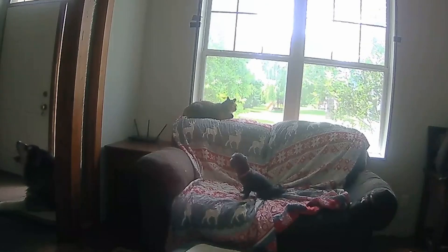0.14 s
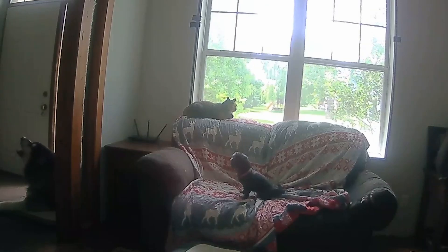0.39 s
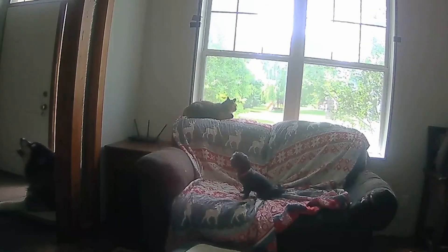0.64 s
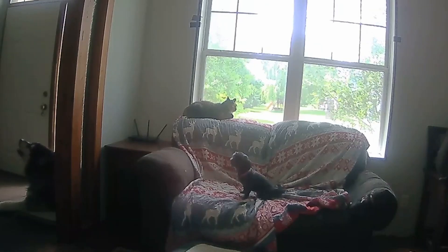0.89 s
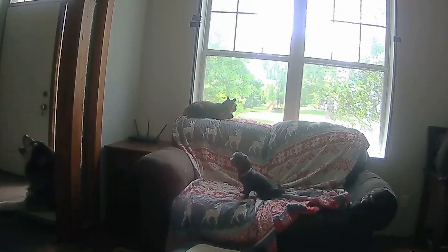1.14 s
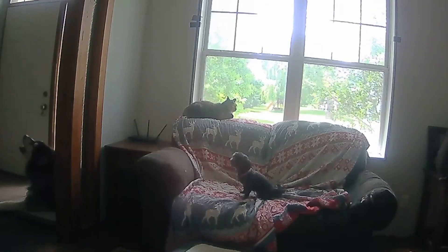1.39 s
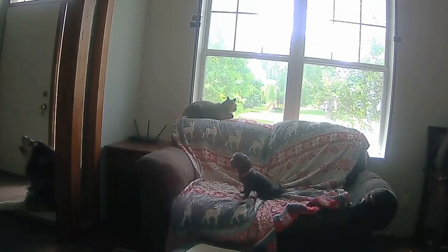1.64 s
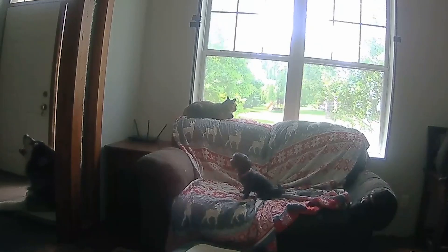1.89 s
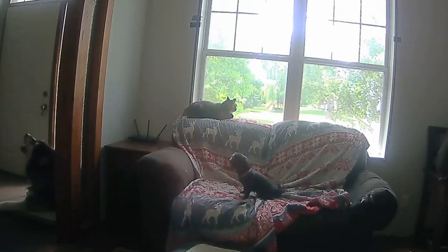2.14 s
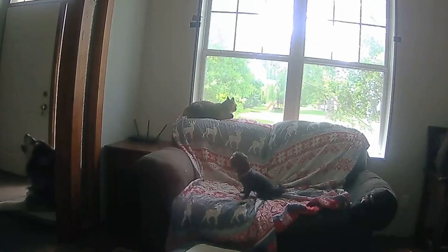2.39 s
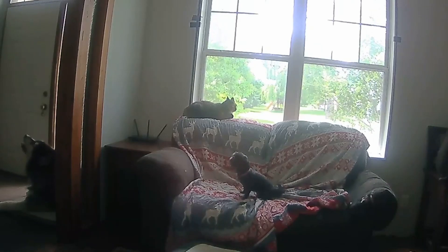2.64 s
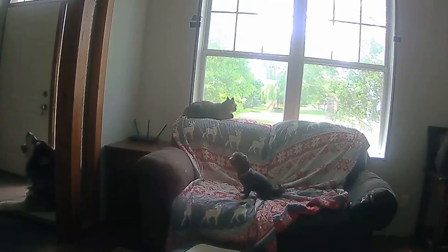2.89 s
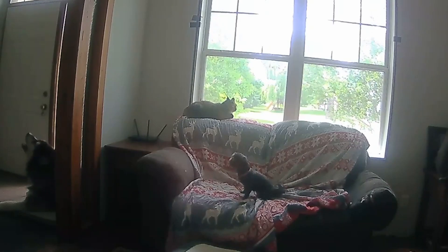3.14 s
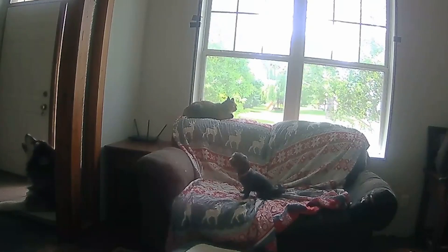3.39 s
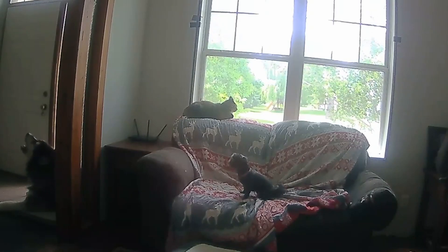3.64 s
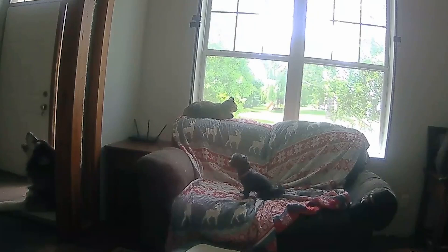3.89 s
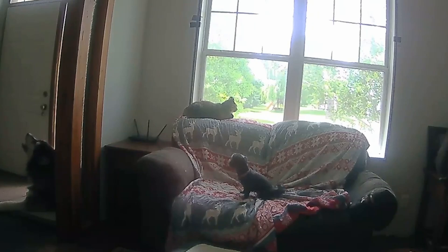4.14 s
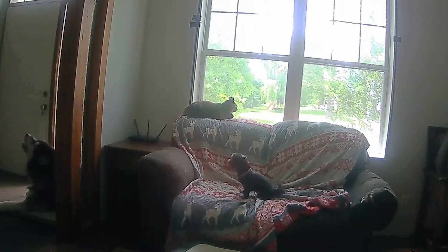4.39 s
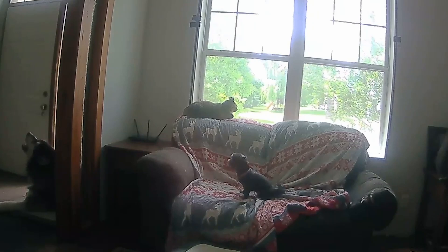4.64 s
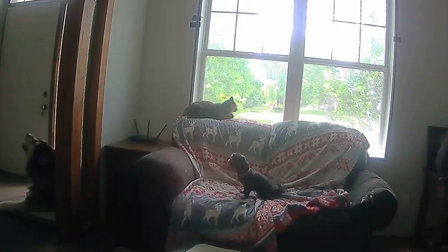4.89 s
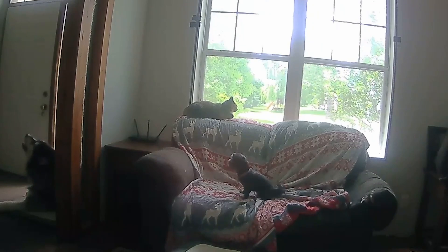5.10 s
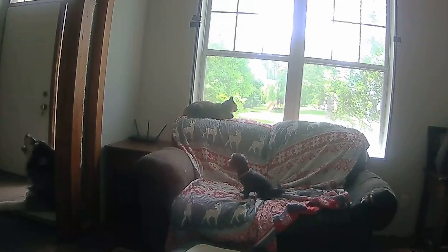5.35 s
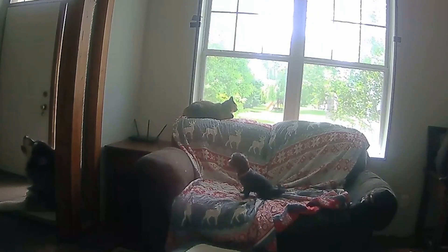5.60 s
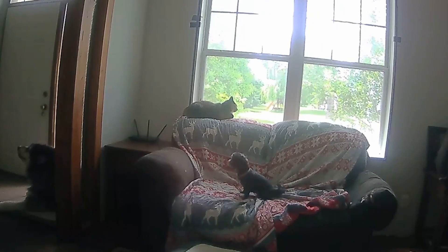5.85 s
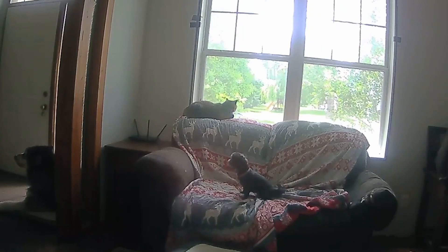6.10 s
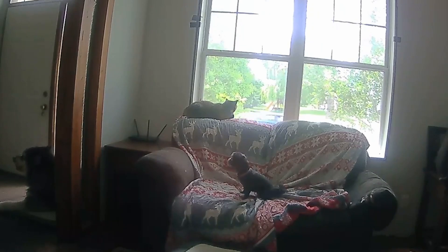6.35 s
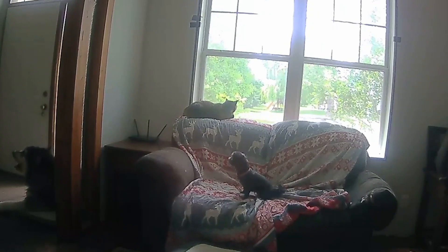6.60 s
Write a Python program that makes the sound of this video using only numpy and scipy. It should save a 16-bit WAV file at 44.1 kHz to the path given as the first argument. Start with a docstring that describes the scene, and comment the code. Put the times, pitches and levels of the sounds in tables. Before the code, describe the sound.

Two dogs howl in a reverberant living room, picked up at a distance by a cheap camera microphone. From 0.1 s the small dog gives a long, high yelp that leaps up, cracks at 0.4 s and slides lower until 1.1 s; the large dog's smooth, lower howl sounds beneath it at 0.2-0.6 s. The large dog calls loudly again at 1.1, 2.0, 2.9, 3.8, 4.6 and 5.5 s, each howl about half a second or less, rising slightly then sagging, the last ones softer. The small dog answers at 1.45, 2.2, 3.1, 3.6, 4.2 and 4.8 s with raspy, whistling, breaking yelps. After a quiet pause near 6 s, it yelps sharply at 6.2 s and falls away hoarsely to 6.7 s. Loud calls clip harshly, quiet tails are suppressed, fuzz and faint hiss remain, and tiny dropouts cut in around 0.8, 1.8, 2.7, 2.9 and 4.0 s.

```python
"""A large dog howls in short low calls while a small dog answers with high gliding yelps, in an echoing living room.
Each call is a stack of gliding harmonics; roughness shakes it, and the small dog adds raspy breath and a second pipe.
Feedback delays and ringing resonances make the room, over a faint steady noise.
A cheap room camera overloads on the loud moments, turns quiet sound down, adds fuzz and loses a few packets."""
import sys
import numpy as np
from scipy import signal
from scipy.fft import rfft, irfft, next_fast_len
from scipy.io import wavfile
from scipy.ndimage import uniform_filter1d

SR = 44100
rng = np.random.default_rng(int(sys.argv[2]) if len(sys.argv) > 2 else 0)


def generate_wav(sig):
    """Save sig (samples, or channels by samples) to the path in sys.argv[1] as 16-bit PCM at SR."""
    pcm = np.round(np.clip(np.atleast_2d(sig).T, -1, 1) * 32767).astype(np.int16)
    wavfile.write(sys.argv[1], SR, pcm)


def attenuation_scalar(level_db):
    """Turn a level in dB into a linear amplitude multiplier (20 dB per decade)."""
    decades = np.asarray(level_db, float) / 20
    return 10 ** decades


N = 297305


def wobble(rate_hz):
    """Low-passed noise of spread 1, for irregular movement."""
    lowpass = signal.butter(2, rate_hz, fs=SR, output="sos")
    slow = signal.sosfilt(lowpass, rng.standard_normal(N))
    return slow / slow.std()


def resonate(x, hz, width_hz):
    """One two-pole resonance with gain 1 on top."""
    r = np.exp(-np.pi * width_hz / SR)
    feedforward = [(1 - r * r) / 2, 0, (r * r - 1) / 2]
    feedback = [1, -2 * r * np.cos(2 * np.pi * hz / SR), r * r]
    return signal.lfilter(feedforward, feedback, x + 1e-18)


def share_effort(rows, muzzle):
    """The muzzle and the mouth opening share the effort among three harmonics, keeping their total power."""
    time_s, pitch_hz, effort_db, opening_db = np.transpose(rows)
    muzzle_hz, muzzle_db = np.transpose(muzzle)
    colour_db = np.array([k * opening_db + np.interp((k + 1) * pitch_hz, muzzle_hz, muzzle_db)
                          for k in range(3)])
    colour_db = colour_db - 10 * np.log10(np.sum(attenuation_scalar(colour_db) ** 2, axis=0))
    return np.transpose([time_s, pitch_hz, *(effort_db + colour_db)])


# breath is bright from STRAIN_DB of effort up; softer breath is dull above SOFT_BREATH_HZ
STRAIN_DB, SOFT_BREATH_HZ, SOFT_BREATH_DB = -17.5, 1890, 3.5


def voice(calls, mouth, count, hoarseness, jitter, tremor_hz, breath, fade_s):
    """Each call stacks harmonics; a hoarse larynx shakes pitch and loudness and lets the given breath through."""
    out = np.zeros(N)
    slow, fast, tremor = wobble(30), wobble(150), wobble(tremor_hz)
    soften = signal.butter(4, SOFT_BREATH_HZ, fs=SR, output="sos")
    dull_breath = signal.sosfilt(soften, breath)
    mouth_hz, mouth_db = np.transpose(mouth)
    for call in calls:
        time_s, pitch_hz, *harmonics_db = np.transpose(call)
        at = np.arange(round(time_s[0] * SR), min(round(time_s[-1] * SR), N))
        t = at / SR
        hoarse = np.interp(t, *np.transpose(hoarseness))
        shake = jitter * (slow[at] + 8.9 * hoarse ** 2 * fast[at])
        pitch = np.interp(t, time_s, pitch_hz)
        phase = 2 * np.pi * np.cumsum(pitch * (1 + shake)) / SR

        gains = [np.sqrt(2) * attenuation_scalar(np.interp(t, time_s, db)) for db in harmonics_db]
        effort = np.sqrt(sum(g ** 2 for g in gains))
        # the mouth sets each higher harmonic against the last one listed
        last = gains[-1]
        for number in range(len(gains) + 1, count + 1):
            gains.append(last * attenuation_scalar(np.interp(number * pitch, mouth_hz, mouth_db)))
        # every harmonic flutters quickly by a few dB, as echoes in the room make it uneven
        gains = [g * attenuation_scalar(2.0 * np.roll(slow, 9001 * k)[at]) for k, g in enumerate(gains)]
        stack = sum(g * np.sin((k + 1) * phase + k * k) for k, g in enumerate(gains))
        stack = stack * (np.sqrt(1 - hoarse ** 2) + hoarse * tremor[at])

        # breath escapes once a cycle, while the folds are open
        strain = np.minimum(effort / attenuation_scalar(STRAIN_DB), 1)
        air = strain * breath[at] + (1 - strain) * attenuation_scalar(SOFT_BREATH_DB) * dull_breath[at]
        puffs = effort * hoarse ** 2 * (1 + np.cos(phase)) * air
        fade = np.clip(np.minimum(t - time_s[0], time_s[-1] - t) / fade_s, 0, 1)
        out[at] += (stack + puffs) * fade
    return out


# large dog, one list a howl, the opening in dB per harmonic: time_s, pitch_hz, effort_db, opening_db
LARGE_DOG_HOWLS = [
    [(0.0, 479, -52.5, -8), (0.05, 463, -45.5, -1), (0.1, 450, -43.5, -1.5)],
    [(0.235, 471, -25.5, -17), (0.26, 481, -19, -12.5), (0.4, 495.2, -14, -2), (0.47, 497.3, -10, -7.5),
     (0.54, 469, -19.5, 0.4), (0.585, 462.3, -20.5, -12.5), (0.63, 475, -28, -9.5)],
    [(1.08, 446, -30.5, -13), (1.1, 446, -11.5, -7), (1.23, 462, -4, -8.5), (1.33, 454.7, -5, -9),
     (1.37, 449.6, -14.5, -9), (1.43, 441.6, -20, -4.5), (1.48, 436, -18.5, 0.5), (1.52, 432, -34.5, -10.5)],
    [(1.93, 402, -65, -14), (1.96, 437, -39, -19), (2.02, 458, -64.5, -17.5)],
    [(2.03, 429, -57, -5), (2.047, 426.7, -20, -9), (2.1, 443.4, -14, -3.5), (2.16, 463.3, -4.5, -4),
     (2.225, 457, -11, -7.5), (2.28, 454, -41, -5.5)],
    [(2.9, 433, -55, -3), (2.92, 442, -18.5, -12.5), (2.955, 436.7, -16, -2), (3.02, 454.4, -7.5, -4),
     (3.1, 455.9, -4, -5), (3.145, 440, -34.5, -2.3), (3.26, 427.3, -20.5, -3.5), (3.295, 430.8, -36.5, 2),
     (3.34, 432, -25, -5)],
    [(3.77, 456, -38, -8.5), (3.785, 444, -22.5, -11.5), (3.83, 445, -16.5, -6), (3.947, 456.1, -6, -5.5),
     (4.03, 445.5, -15.5, -4), (4.1, 443.6, -18, -6), (4.145, 431.5, -18, -3.5), (4.2, 420, -34.5, -4.5),
     (4.26, 391, -33, -15)],
    [(4.56, 440, -37.5, -7), (4.585, 443, -24, -9), (4.625, 446.3, -16.5, -3.5), (4.665, 449.8, -23, -2),
     (4.7, 451, -10.5, -7), (4.77, 454.7, -12, -6), (4.8, 440.2, -21.5, -2.8), (4.893, 432, -27.5, 1),
     (4.99, 398.2, -31, -5.5), (5.06, 383, -41, -3)],
    [(5.48, 420, -66, -12), (5.497, 433, -21.5, -14.5), (5.535, 444.2, -17, -4), (5.57, 450, -22, -6),
     (5.61, 458, -13.5, -2.5), (5.65, 452, -24, 1.2), (5.7, 442.4, -26.5, 0.5), (5.76, 429.5, -38, -1.5),
     (5.86, 409, -55, 3)],
]
# its muzzle, for the first three harmonics: frequency_hz, level_db
LARGE_DOG_MUZZLE = [(450, -1.08), (900, 3), (1350, -1.8)]
# its mouth, for higher harmonics, against the 3rd: frequency_hz, level_db
LARGE_DOG_MOUTH = [(1700, -21), (2300, -35.5), (3000, -40)]
# hoarseness 0-1: howls that stay under FAINT_DB of effort are rough, the others clear
CLEAR, ROUGH, FAINT_DB = .09, .7, -35


def large_dog():
    """Low howls of six harmonics: nearly pure from a steady larynx, rough when faint, with no breath noise."""
    hoarseness = []
    for rows in LARGE_DOG_HOWLS:
        loudest_db = max(row[2] for row in rows)
        hoarse = ROUGH if loudest_db < FAINT_DB else CLEAR
        hoarseness += [(rows[0][0], hoarse), (rows[-1][0], hoarse)]
    calls = [share_effort(rows, LARGE_DOG_MUZZLE) for rows in LARGE_DOG_HOWLS]
    return voice(calls, LARGE_DOG_MOUTH, count=6, hoarseness=hoarseness, jitter=.003,
                 tremor_hz=120, breath=np.zeros(N), fade_s=.015)


# relative colour of the quiet room tone: frequency_hz, density_db (per Hz)
ROOM_TONE_COLOUR = [(35, -30), (60, -9), (729, -8), (1350, -10.5), (8000, -9.5), (10400, -58),
                    (17600, -120)]
ROOM_TONE_DB = -61.5


def room_tone():
    """Faint steady noise, coloured along a log-frequency curve."""
    hz = np.maximum(np.arange(N // 2 + 1) * SR / N, 1)
    curve_hz, curve_db = np.transpose(ROOM_TONE_COLOUR)
    colour = attenuation_scalar(np.interp(np.log(hz), np.log(curve_hz), curve_db))
    noise = irfft(rfft(rng.standard_normal(N)) * colour, N)
    return attenuation_scalar(ROOM_TONE_DB) * noise / noise.std()


# strongest ringing pitches of the room: frequency_hz, level_db, t60_s
RINGING_MODES = [(440, -12.5, 0.087), (588, -23.5, 0.91), (773, -5, 0.68), (863, -1, .5),
                 (1045.7, 3.5, 0.17), (1250, -5.5, 0.49), (1192, 1, 0.3), (1350, -14.5, 0.51)]
ROOM_T60_S, WALL_CUT_HZ, ROOM_DB = 0.27, 13000, -10


def room(x):
    """Ten feedback delays, duller on every round, plus a few narrow resonances that hold a passing pitch."""
    size = next_fast_len(N + SR)
    hz = np.arange(size // 2 + 1) * SR / size
    dull = 1 / np.sqrt(1 + (hz / WALL_CUT_HZ) ** 2)
    tail = 0
    for k, lag_s in enumerate(rng.uniform(.018, 0.049, size=10)):
        loop = attenuation_scalar(-60 * lag_s / ROOM_T60_S) * dull ** .5 * np.exp(-2j * np.pi * hz * lag_s)
        tail = tail + (-1) ** k * loop / (1 - loop)
    out = attenuation_scalar(ROOM_DB) * irfft(rfft(x, size) * tail, size)[:N]
    for mode_hz, level_db, t60_s in RINGING_MODES:
        width_hz = np.log(1000) / (np.pi * t60_s)
        out += attenuation_scalar(level_db) * resonate(x, mode_hz, width_hz)
    return out


# throat resonances that colour the small dog's rasp, levels relative: frequency_hz, width_hz, level_db
THROAT_RESONANCES = [(1050, 190, 11.5), (1940, 260, -12.5), (2640, 670, 1), (3890, 230, -3.5),
                     (5700, 1900, 2.5)]


def rasp(level_db):
    """Turbulent breath: white noise coloured by the throat, each resonance passed twice."""
    white = rng.standard_normal(N)
    out = np.zeros(N)
    for k, (hz, width_hz, peak_db) in enumerate(THROAT_RESONANCES):
        ringing = resonate(resonate(white, hz, width_hz), hz, 2 * width_hz)
        out += (-1) ** k * attenuation_scalar(peak_db) * ringing
    return attenuation_scalar(level_db) * out / out.std()


# small dog, one list for each stretch of voice; a yelp whose pitch breaks takes two lists;
# the opening in dB per harmonic: time_s, pitch_hz, effort_db, opening_db
SMALL_DOG_YELPS = [
    [(0.092, 765.6, -43, 5.5), (0.106, 813.6, -18.5, 4), (0.128, 1025, -10, -1), (0.142, 1175, -10, -6.5),
     (0.158, 1179, -8.5, -1.5), (0.202, 1179, -22, -1), (0.286, 1246, -13.5, -1.5),
     (0.4, 1169, -17.5, -9.5)],
    [(0.4, 1006, -12.5, -11), (0.448, 995, -21, -1), (0.54, 838, -24, -5), (0.622, 885.4, -20.5, 3),
     (0.774, 761, -29.5, -3.5), (0.79, 701.7, -27, -8), (0.872, 704.6, -26.5, -10.5),
     (0.915, 754, -21, -5.5), (0.962, 778, -12, -9), (1.066, 758, -17, -11), (1.14, 772, -15.5, -13.5)],
    [(1.45, 710, -26.5, -15.5), (1.476, 849.3, -25.5, -6.5), (1.492, 928.6, -13, -6.5),
     (1.518, 1039, -9, -10), (1.548, 978, -17.5, 4), (1.8, 980.7, -56, 4)],
    [(2.21, 834.5, -13.5, 2), (2.23, 846, -15, 5.5), (2.4, 946.6, -29.5, 5.5), (2.418, 1050, -26.5, 7),
     (2.502, 1149, -10.5, -5), (2.515, 1035, -29, 1), (2.57, 1085, -26, 0), (2.62, 1048, -25, 1.9),
     (2.708, 894.3, -21.5, -4), (2.806, 854.6, -25, -4), (2.826, 739, -39.5, -6), (2.91, 706, -31.5, -14)],
    [(3.09, 816.7, -29.5, 2.5), (3.13, 1021, -10.5, -3), (3.174, 924, -17, 1), (3.21, 962, -19, 0.8),
     (3.25, 942, -24.5, -3), (3.34, 950, -36, 3)],
    [(3.6, 816, -56, 10.5), (3.626, 828, -16, 0.5), (3.664, 927, -18, 0.6), (3.69, 816, -13, 10),
     (3.756, 883, -39.5, 4), (3.84, 914, -31, -5.5)],
    [(4.24, 782, -35.5, -8.5), (4.26, 824.6, -18.5, 2.5), (4.302, 952.5, -18, 8.5), (4.35, 862, -18.5, 8),
     (4.37, 904, -31, 13), (4.492, 885.6, -32.5, -2.5), (4.58, 782, -40.5, -26)],
    [(4.79, 760, -31, -4.5), (4.81, 891.5, -14.5, -3), (4.852, 910.6, -22.5, 8), (4.89, 860.3, -17, 4.5),
     (4.916, 863, -26.5, 6.5), (5.034, 834.5, -44.5, -14.5), (5.138, 892, -64.5, -23),
     (5.45, 737, -64, -24)],
    [(6.238, 762, -39.5, 6), (6.258, 915.6, -13.5, -3), (6.29, 1146, -10.5, -7), (6.315, 1208, -10.5, -5),
     (6.345, 1168, -12, -9), (6.37, 1012, -7, -4)],
    [(6.37, 1008, -11, 7.3), (6.41, 989.6, -25, -5.5), (6.44, 887, -31, 2), (6.494, 792, -31, -3),
     (6.545, 709.7, -30.5, -9.8), (6.61, 714, -29, -10.8), (6.692, 634, -27, -22),
     (6.74, 539.5, -34.5, -26)],
]
# how torn its voice is: time_s, hoarseness (0-1)
SMALL_DOG_HOARSENESS = [(.09, .3), (.13, .5), (.5, .5), (.56, .25), (1.14, .15), (1.55, .3), (1.62, .55),
                        (2.21, .65), (2.4, .6), (2.46, .3), (2.6, .2), (2.91, .3), (3.09, .4), (3.2, .5),
                        (3.3, .25), (3.46, .1), (3.6, .45), (3.7, .6), (4.24, .45), (4.79, .3), (5, .45),
                        (5.1, .95), (5.45, .95), (6.24, .4), (6.29, .5), (6.34, .45), (6.38, .65),
                        (6.46, .5), (6.7, .65)]
# its muzzle, for the first three harmonics: frequency_hz, level_db
SMALL_DOG_MUZZLE = [(700, -3), (1100, 3), (1700, 5), (2100, 1), (2600, -0.85), (3500, 1.7)]
# its mouth, for higher harmonics, against the 3rd: frequency_hz, level_db
SMALL_DOG_MOUTH = [(2500, -13.5), (3600, -1.5), (4200, -8.5), (5000, -9.5), (5700, -4.5), (7000, -16.5)]
# a second, unrelated pipe in its hardest cries, one list a whistle: time_s, pitch_hz, level_db
SECOND_PIPE = [
    [(1.55, 1041, -22), (1.66, 994.3, -22.5), (1.818, 1033, -39.5), (1.86, 1156, -39), (1.89, 1116, -63.5)],
    [(2.25, 1164, -40.5), (2.276, 1125, -12), (2.384, 1147, -17), (2.396, 1050, -17), (2.44, 984, -19.5)],
    [(3.17, 1050, -32.5), (3.256, 1041, -17), (3.3, 1025, -18.5), (3.325, 1026, -29), (3.42, 1038, -33),
     (3.48, 1030, -44)],
    [(3.61, 1020, -31.5), (3.622, 1153, -33), (3.652, 967, -33.5), (3.76, 987, -27), (3.84, 949, -47)],
    [(4.26, 983, -35), (4.31, 1133, -20.5), (4.392, 1119, -22.5), (4.416, 977.6, -20), (4.52, 962, -56.5)],
    [(6.36, 1212, -19.5), (6.39, 1168, -15), (6.42, 1172, -28), (6.52, 1178, -30)],
]


def small_dog():
    """Yelps with raspy breath and whistles; the small head passes nothing far outside its resonances."""
    calls = [share_effort(rows, SMALL_DOG_MUZZLE) for rows in SMALL_DOG_YELPS]
    yelps = voice(calls, SMALL_DOG_MOUTH, count=9, hoarseness=SMALL_DOG_HOARSENESS, jitter=.005,
                  tremor_hz=138.9, breath=rasp(level_db=-2.0), fade_s=0.01)
    # a whistle is a fundamental and a weaker octave
    whistles = voice(SECOND_PIPE, [(2000, -14.5)], count=2, hoarseness=[(0, 0.41)], jitter=0.004,
                     tremor_hz=57.0, breath=np.zeros(N), fade_s=.015)
    head = signal.cheby2(6, 32, [380, 6400], "band", fs=SR, output="sos")
    return signal.sosfilt(head, yelps + whistles)


def scene():
    """Both dogs, their echoes in the room and the room tone."""
    dogs = large_dog() + small_dog()
    return (dogs + room(dogs) + room_tone())[None]


def overload(x, gain_db, top, bottom, hardness):
    """The preamplifier flattens peaks, earlier on the positive side when top is below bottom."""
    x = attenuation_scalar(gain_db) * x
    limit = np.where(x > 0, top, bottom)
    return x / (1 + (abs(x) / limit) ** hardness) ** (1 / hardness)


def thin_lows(x):
    """A high-pass, then a low shelf that thins the howl and tilts its flattened tops."""
    x = signal.sosfilt(signal.butter(2, 70, "high", fs=SR, output="sos"), x)
    highs = signal.sosfilt(signal.butter(1, 600, "high", fs=SR, output="sos"), x)
    return highs + attenuation_scalar(-8) * x


def suppressor(x, knee_db, slope, most_db, bin_knee_db, bin_slope):
    """Sound under a knee is taken for noise and turned down: as a whole, then pitch by pitch."""
    power = uniform_filter1d(x ** 2, round(.025 * SR))
    level_db = 10 * np.log10(np.maximum(power, 1e-12))
    x = x * attenuation_scalar(np.clip(slope * (level_db - knee_db), -most_db, 0))

    frames = signal.stft(x, nperseg=1024, noverlap=768)[2]
    power = uniform_filter1d(abs(frames) ** 2, size=5, axis=0)
    power = uniform_filter1d(power, size=5, axis=1)
    bin_db = 10 * np.log10(np.maximum(power, 1e-14))
    gain = attenuation_scalar(np.clip(bin_slope * (bin_db - bin_knee_db), -most_db, 0))
    return signal.istft(frames * gain, nperseg=1024, noverlap=768)[1][:N]


# lost packets: start_s, end_s
LOST_PACKETS = [(.7561, .7761), (1.7961, 1.8161), (2.7161, 2.7961), (2.8561, 2.8761), (4.0361, 4.0561)]


def lose_packets(x):
    """Each lost packet leaves a hard-edged silence."""
    t = np.arange(N) / SR
    for start_s, end_s in LOST_PACKETS:
        x = x * np.where((t > start_s) & (t < end_s), 0, 1)
    return x


def frame_fuzz(x, fuzz_db, spread_hz, size=4096):
    """Noise shaped by each long frame's smoothed spectrum; fills gaps between lines, leaks ahead of attacks."""
    frames = signal.stft(x, window="boxcar", nperseg=size)[2]
    power = uniform_filter1d(abs(frames) ** 2, round(spread_hz * size / SR), axis=0)
    shape = np.sqrt(np.maximum(power, 0))
    white = signal.stft(rng.standard_normal(N), nperseg=size)[2]
    fuzz = signal.istft(shape * white / abs(white).mean(), window="cosine", nperseg=size)[1][:N]
    return attenuation_scalar(fuzz_db) * fuzz


def top_cut(x):
    """Nothing passes above the cut-off."""
    return signal.sosfilt(signal.butter(12, 9210, fs=SR, output="sos"), x)


def record(dry):
    """The camera's chain: overload, thin lows, suppressor, lost packets, fuzz, narrow band."""
    x = overload(dry[0], gain_db=0.5, top=0.16, bottom=0.25, hardness=45.0)
    x = thin_lows(x)
    x = suppressor(x, knee_db=-24.5, slope=0.4, most_db=11.5, bin_knee_db=-80, bin_slope=0.64)
    x = lose_packets(x)
    x = x + frame_fuzz(x, fuzz_db=-32.0, spread_hz=3200)
    x = signal.sosfilt(signal.cheby2(10, 52, 9400, fs=SR, output="sos"), x)
    return top_cut(x)


dry = scene()
out = record(dry)
generate_wav(out)
```